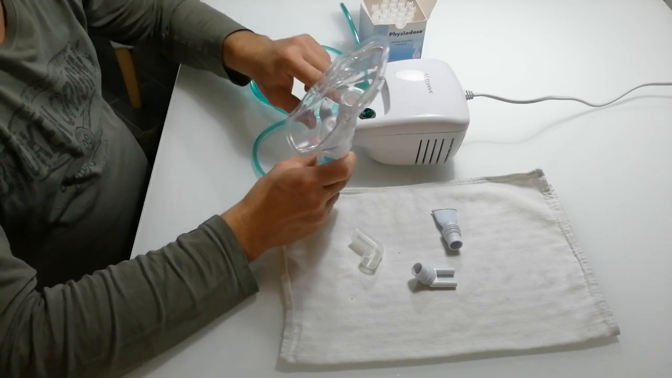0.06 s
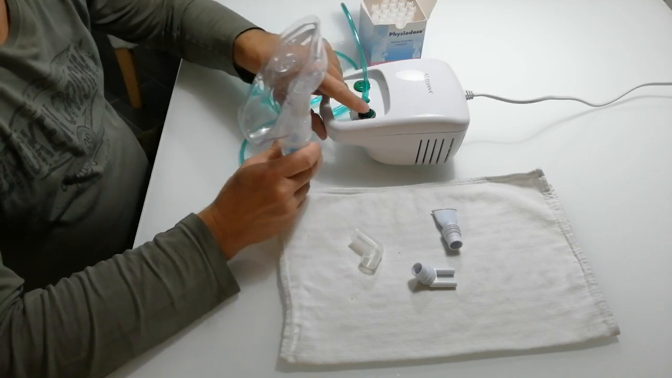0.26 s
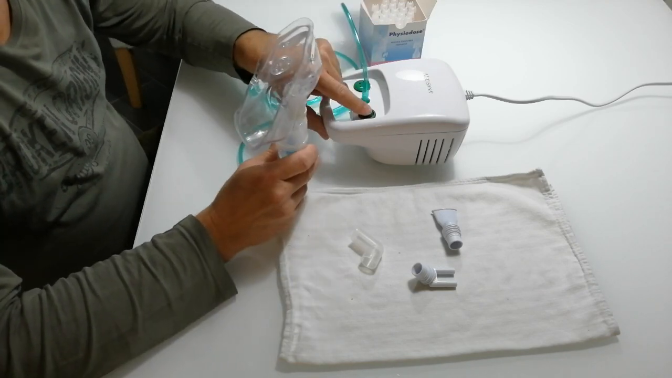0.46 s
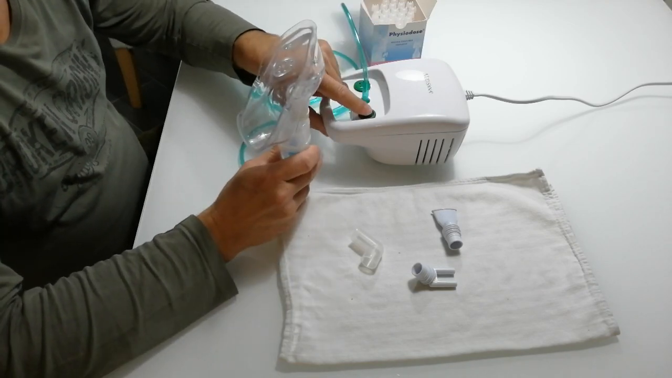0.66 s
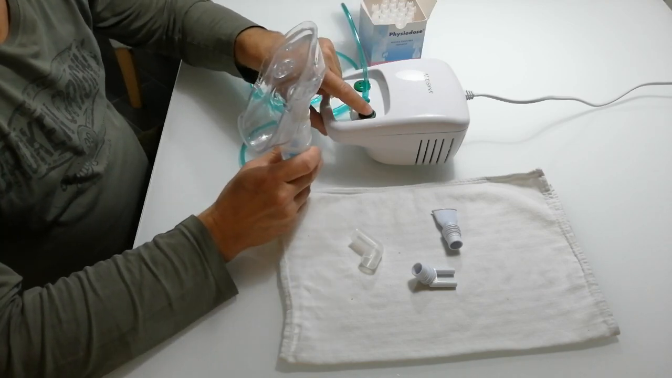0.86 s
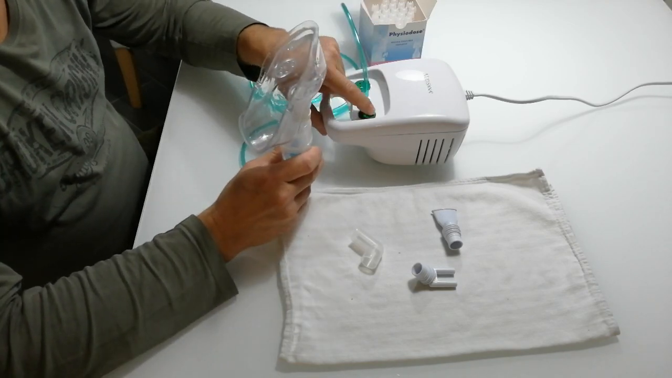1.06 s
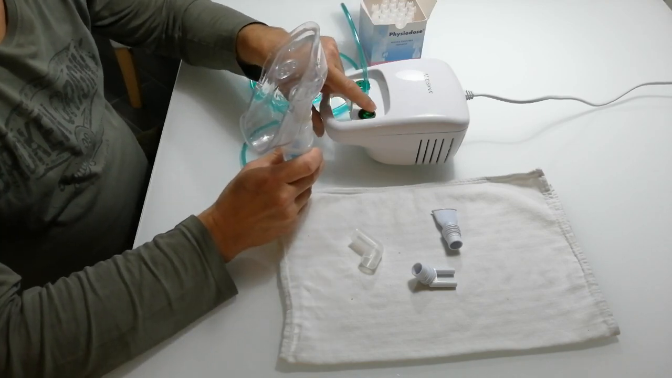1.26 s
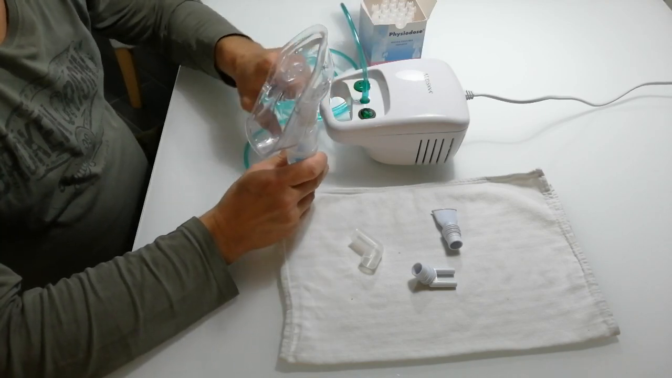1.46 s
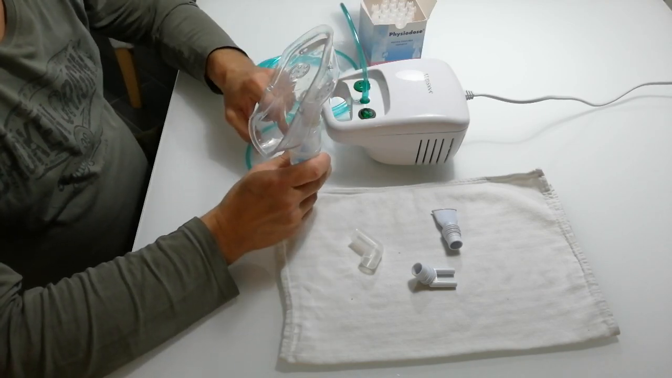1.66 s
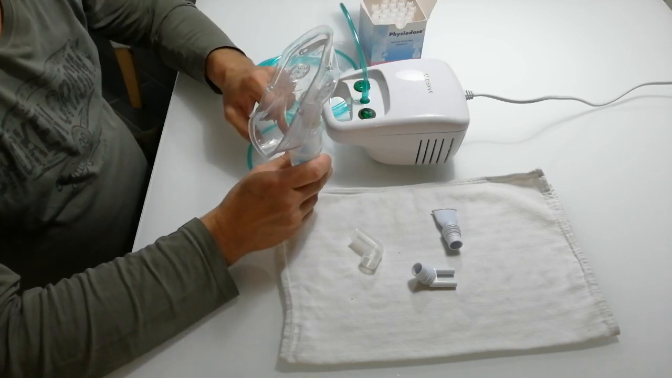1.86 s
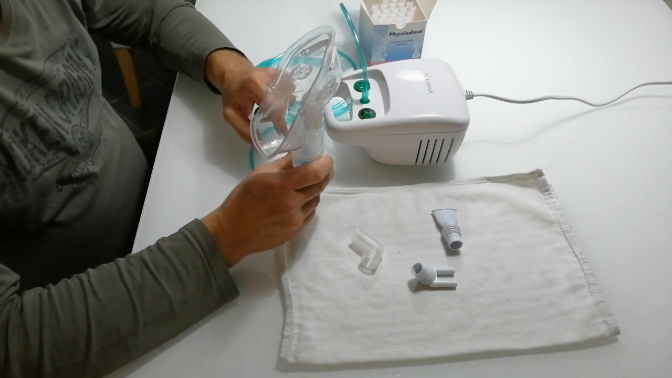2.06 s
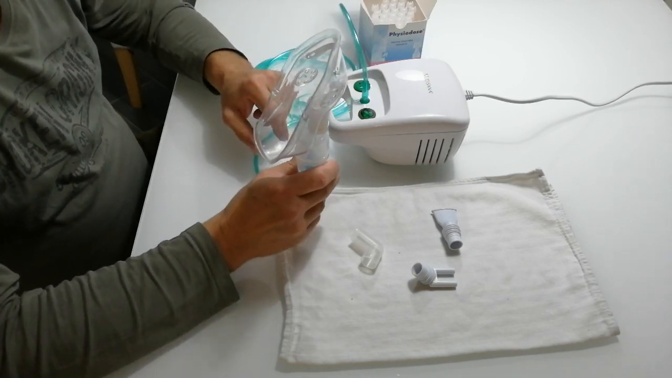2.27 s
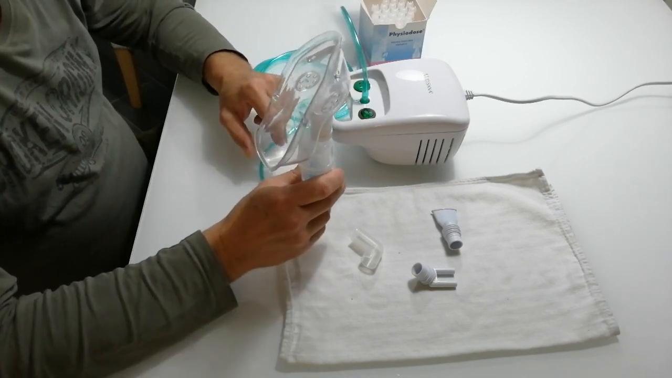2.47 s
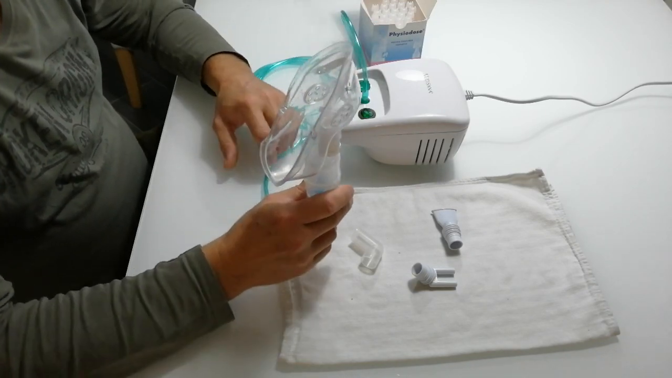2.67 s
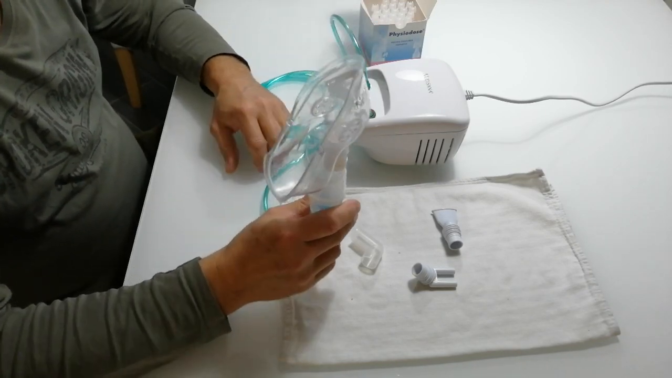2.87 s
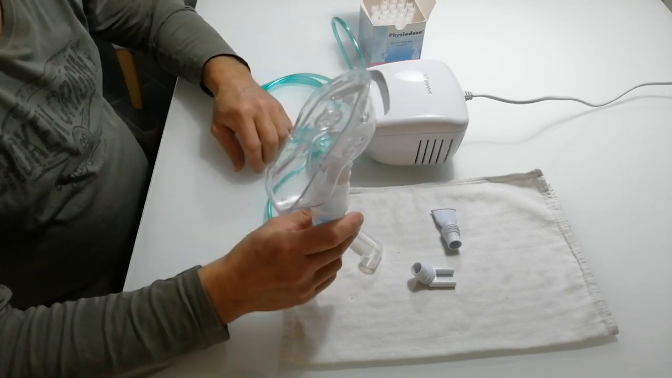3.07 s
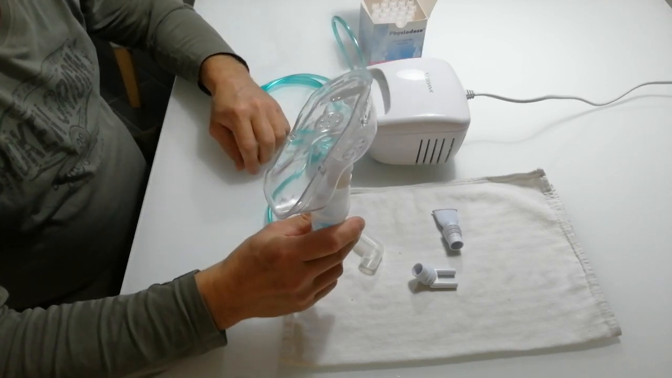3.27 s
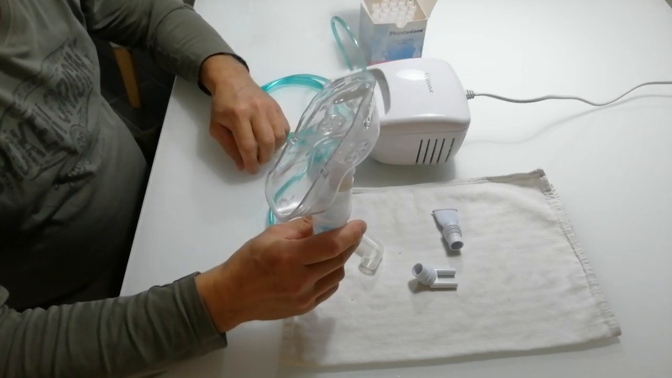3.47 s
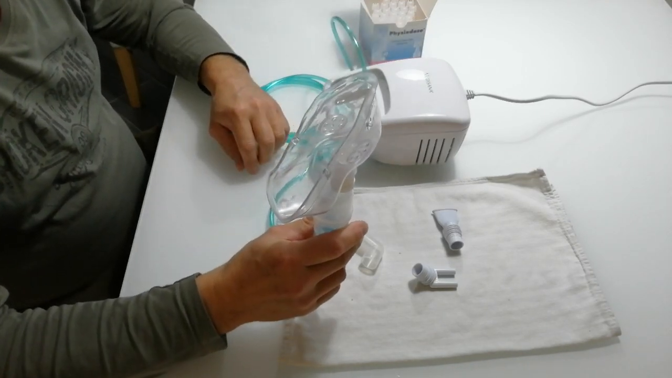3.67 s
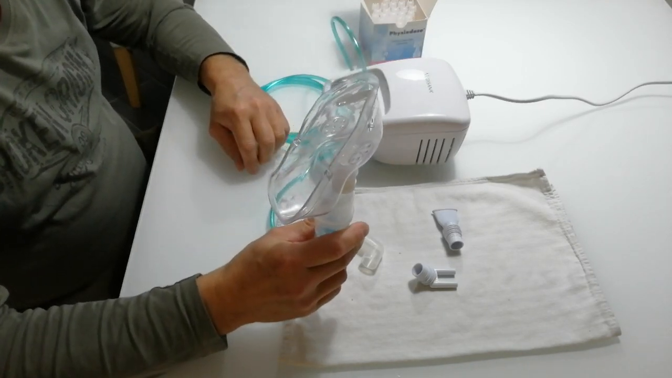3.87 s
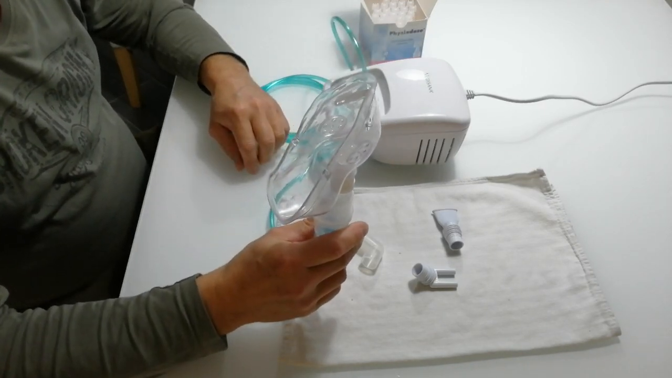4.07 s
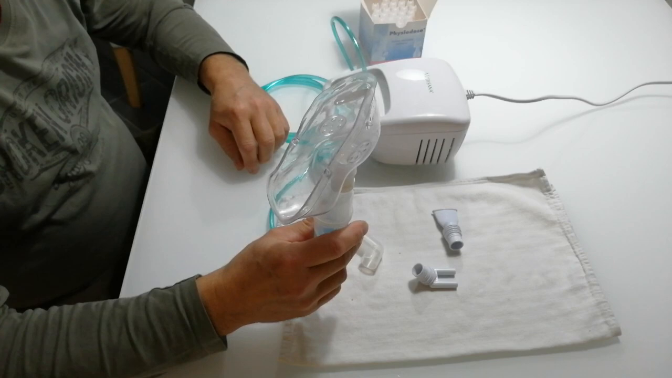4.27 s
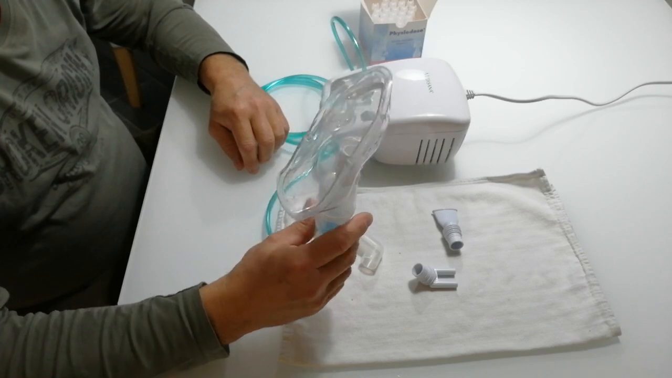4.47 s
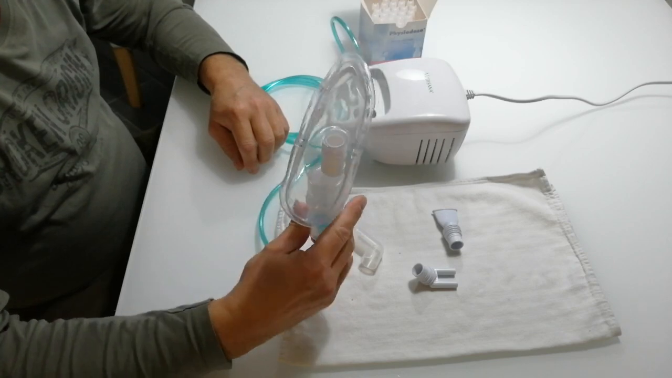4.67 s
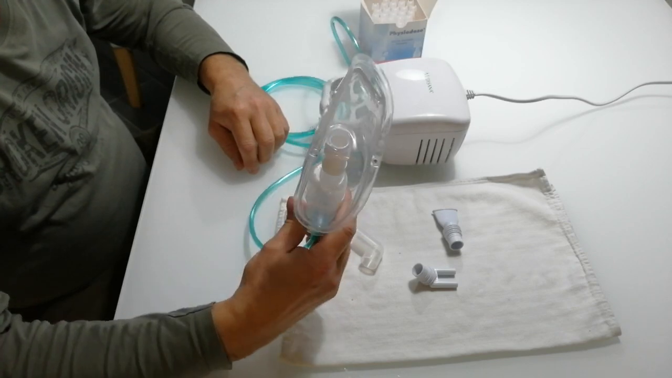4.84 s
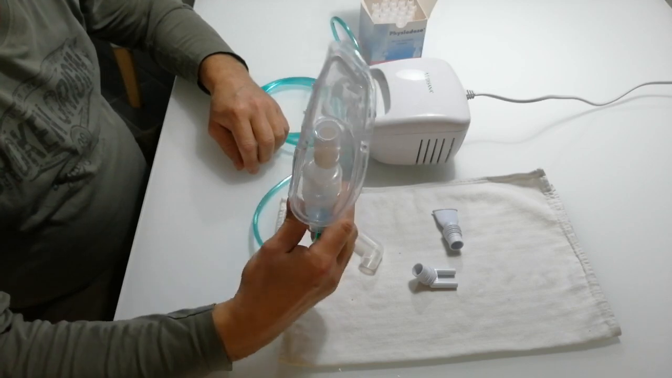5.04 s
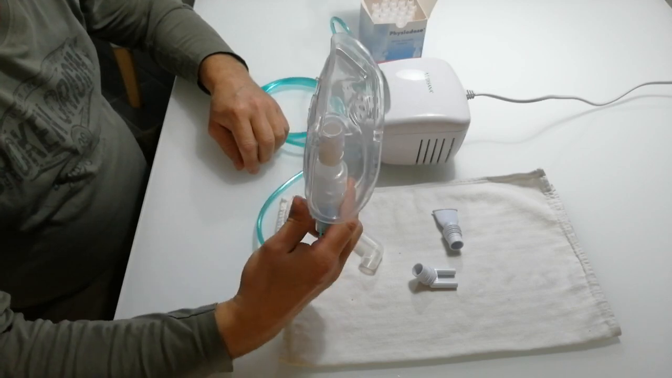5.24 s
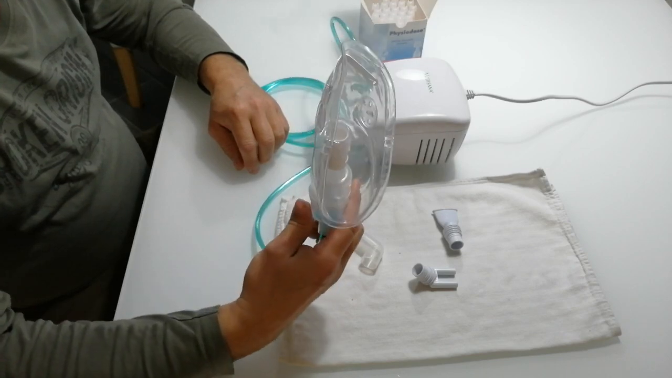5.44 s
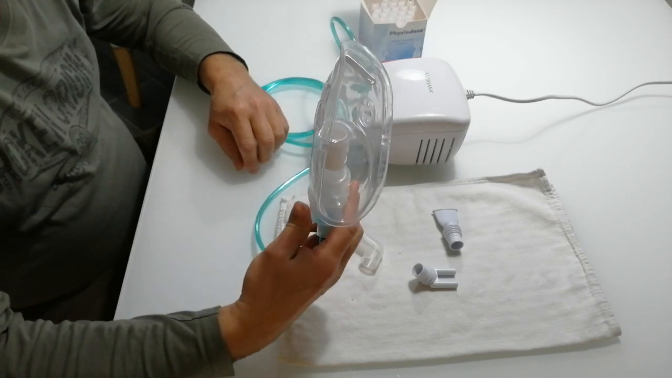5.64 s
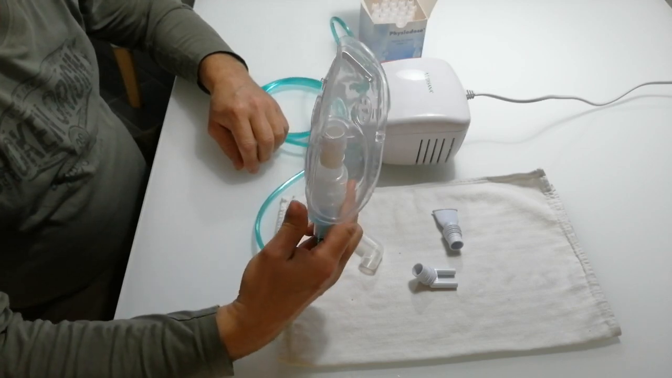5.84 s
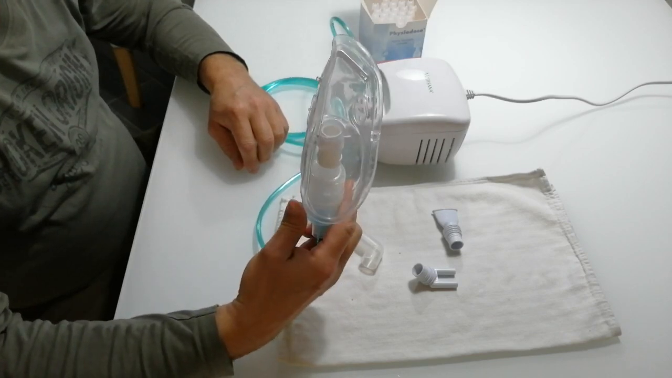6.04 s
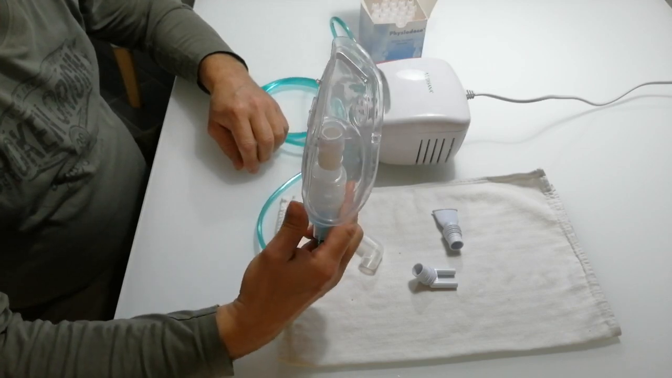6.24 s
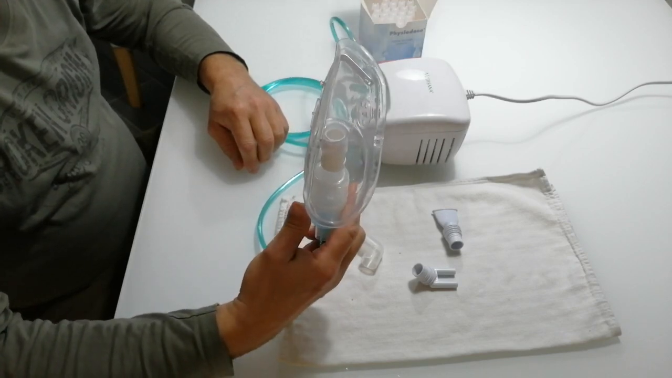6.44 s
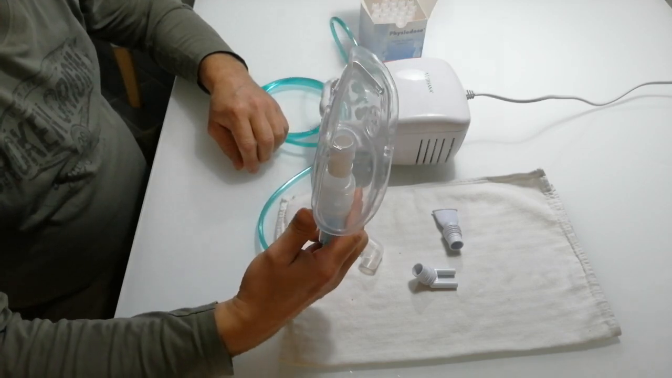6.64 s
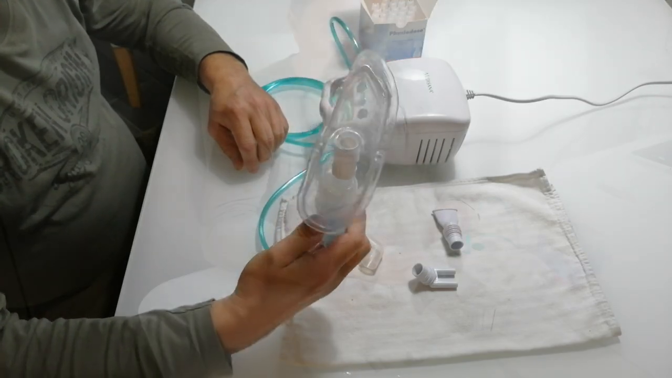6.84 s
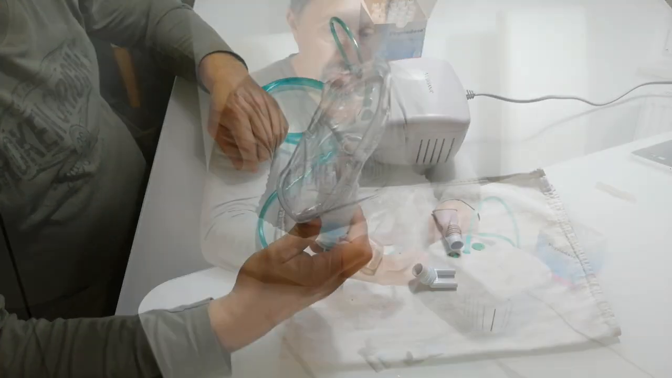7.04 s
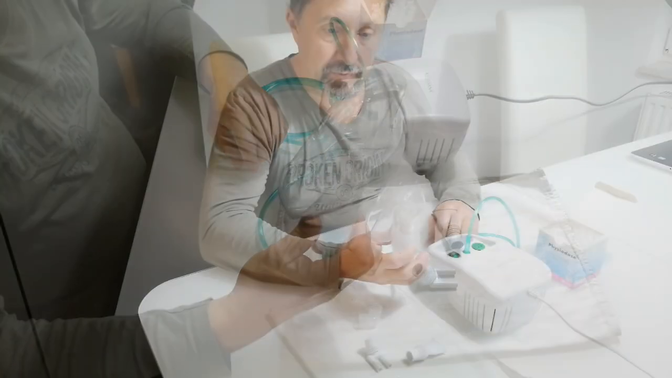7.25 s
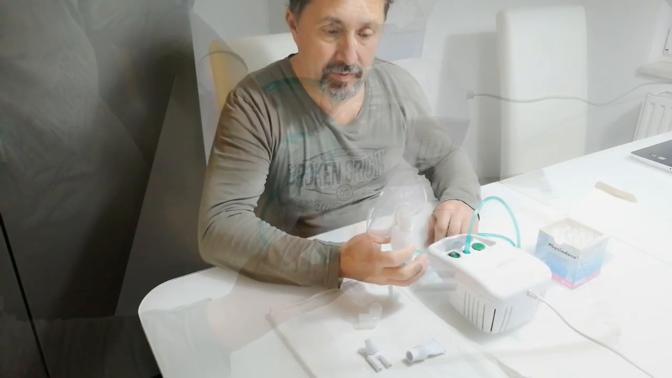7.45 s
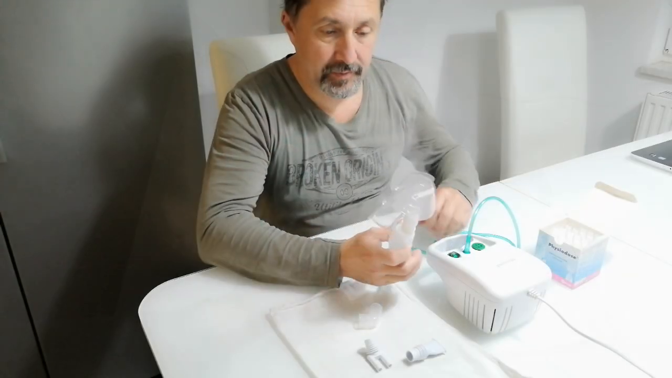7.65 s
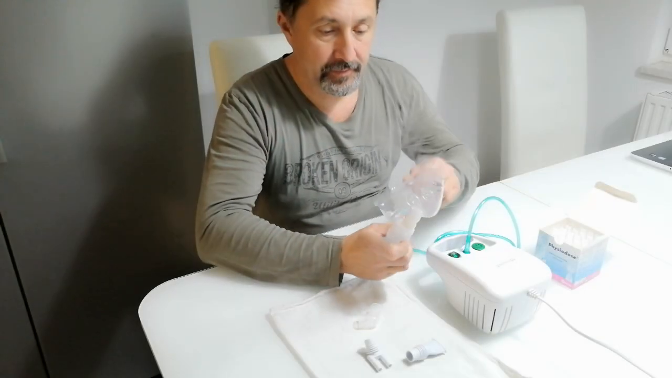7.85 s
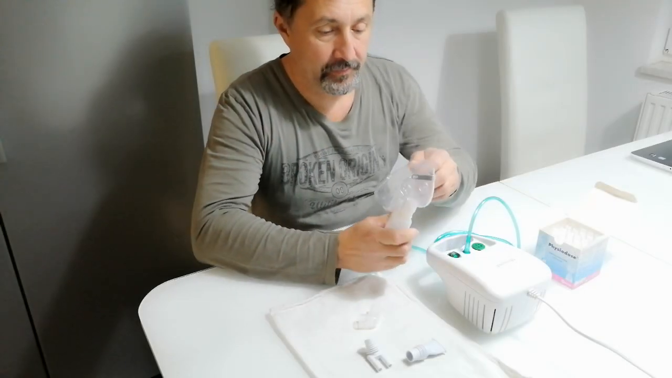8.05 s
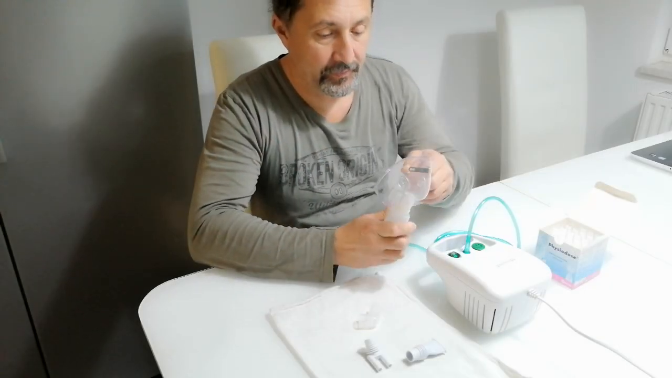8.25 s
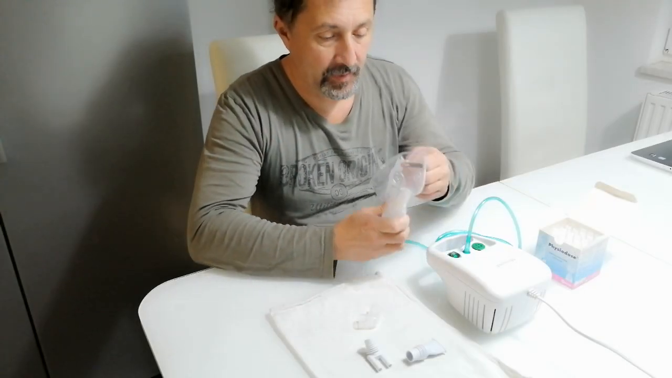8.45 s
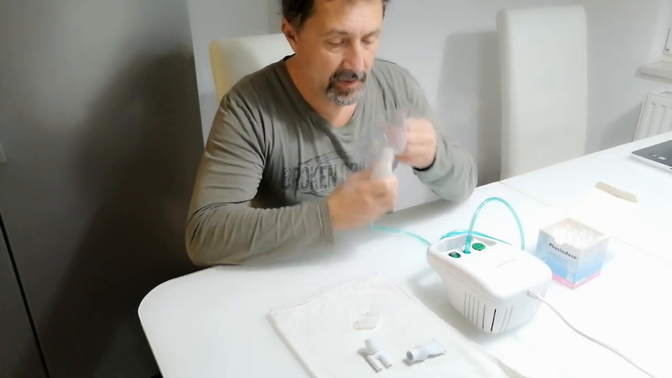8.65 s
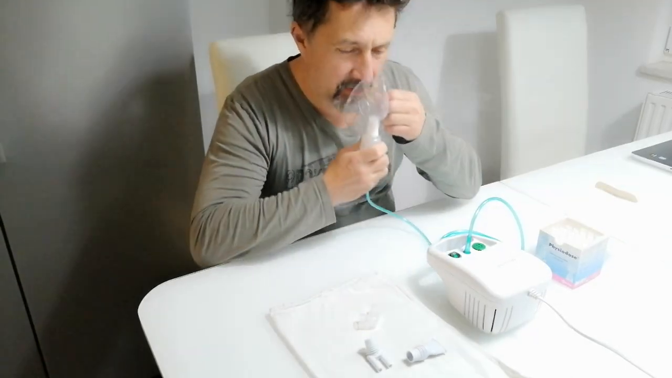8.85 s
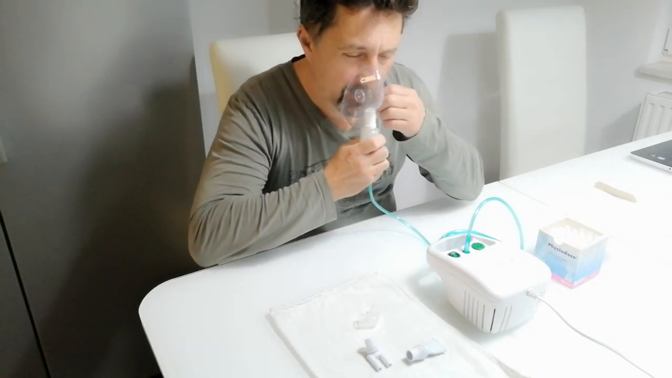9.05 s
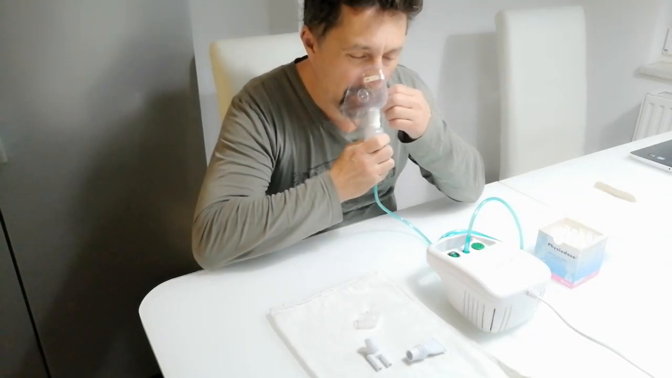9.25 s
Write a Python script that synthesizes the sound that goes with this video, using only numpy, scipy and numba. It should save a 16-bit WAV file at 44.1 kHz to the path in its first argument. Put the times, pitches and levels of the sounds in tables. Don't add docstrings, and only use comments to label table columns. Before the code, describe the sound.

Close in a quiet room, dull knocks come through a table, a plastic mask creaks faintly and an arm judders low on the tabletop. A rocker switch snaps, a small piston compressor stutters and spins up, then drones with a rattling buzz while air hisses through a mist cup and moving mask. Occasional knocks follow; near the end the sound cross-fades to a thinner, farther position.

```python
import sys
import numpy as np
from scipy import signal
from scipy.fft import rfft, irfft, next_fast_len
from scipy.io import wavfile
from scipy.ndimage import map_coordinates
from numba import njit

SR = 44100
rng = np.random.default_rng(int(sys.argv[2]) if len(sys.argv) > 2 else 0)


def digitize_waveform(pressure):
    field = np.atleast_2d(pressure).T
    bounded = np.clip(field, -1, 1)
    quanta = np.round(bounded * 32767).astype(np.int16)
    wavfile.write(sys.argv[1], SR, quanta)


def voltage_ratio(decibels):
    exponent = np.asarray(decibels, float) / 20
    return 10 ** exponent


N = 410571
TIME = np.arange(N) / SR
CATCH_S, FULL_S = 1.28, 1.385

# (time [s], mouth turned to the microphone [0-1],
# extra path via the table top [ms], strength of that bounce [0-1])
HAND_POSES = [(1.3, 0.2, 1.8, .2), (1.66, 0.16, 1.82, .4), (1.75, 0.2, 1.84, .5), (2.1, .15, 1.9, .56),
              (3.1, 0.63, 2.3, .54), (4.45, 0.64, 2.3, .4), (4.7, 1, 2.1, .3), (5.2, 1, 2.0, .3),
              (6.6, 0.9, 1.8, .3), (7.9, 0.33, 1.6, .4), (8.25, .2, 1.7, 1), (8.42, .9, 1.7, .9),
              (8.6, 0.3, 1.6, .7), (8.85, 0.35, 1.35, .5), (9.0, 0.9, 1.3, .8), (9.15, 0.5, 1.33, .7),
              (9.31, 0.9, 1.36, .7)]
STAGE_S = [
    1.75,
    2.35,
    3.8,
    5.8,
]


def level(x, db):
    return x * voltage_ratio(db) / np.sqrt(np.mean(x ** 2))


@njit
def svf(x, hz, width):
    y, band, low = np.empty(len(x)), 0., 0.
    g, k = np.tan(np.pi * hz / SR), width / hz
    for i in range(len(x)):
        v = (band + g * (x[i] - low)) / (1 + g * (g + k))
        band = 2 * v - band
        low += 2 * g * v
        y[i] = k * v
    return y


def ring(x, modes):
    out = 0
    for k, (hz, width, db) in enumerate(modes):
        stage_width = 1.76 * width
        once = svf(x + 1e-18, 1. * hz, stage_width)
        out = out + (-1) ** k * voltage_ratio(db) * svf(once + 0, 1. * hz, stage_width)
    return out


def on_log(table, hz):
    points_hz, values = np.transpose(table)
    return np.interp(np.log(np.maximum(hz, 1)), np.log(points_hz), values)


def walk(rate, size=N):
    knots = rng.standard_normal(int(size * rate / SR) + 2)
    return np.interp(np.arange(size) * rate / SR, np.arange(len(knots)), knots)


def stereo_noise(spectrum, alike_hz, lag_s, size=N):
    fast = next_fast_len(size)
    hz = np.arange(fast // 2 + 1) * SR / fast
    mid = rfft(rng.standard_normal(fast))
    side = rfft(rng.standard_normal(fast))
    alike = 1 / (1 + (hz / alike_hz) ** 2)
    pair = np.sqrt(1 + alike) * mid + np.sqrt(1 - alike) * side * np.array([[1], [-1]])
    pair[0] *= np.exp(-2j * np.pi * hz * lag_s)
    return level(irfft(pair * voltage_ratio(on_log(spectrum, hz)), fast)[:, :size], 0)


def bursts(events, rise):
    out = np.zeros(N)
    for s, db, length in events:
        t = np.arange(int(3 * length * SR)) / SR
        shape = (1 - np.exp(-t / rise)) * np.exp(-np.log(1000) * t / (2 * length))
        start = int(s * SR)
        out[start:start + len(t)] += voltage_ratio(db) * shape * rng.standard_normal(len(t))
    return out


def ports(x, pan_db):
    return np.array([x, np.roll(x, 8)]) * voltage_ratio(np.array([[pan_db], [-pan_db]]) / 2)


def stroke_phases(db, smear):
    ring_after, stroke_lean = .55, 1.1
    log_gain = np.log(voltage_ratio(np.interp(np.arange(65), np.arange(1, len(db) + 1), db)))
    cepstrum = irfft(log_gain)
    cepstrum[1:64] *= 2
    cepstrum[65:] = 0
    return ring_after * rfft(cepstrum).imag[1:len(db) + 1] + stroke_lean + smear


def pump(span, hz, stages, stage_s, valve, sides, rattle, rattle_db, gate, smear, left_lag, turns=0.):
    size = len(hz)
    turn = 2 * np.pi * (turns + np.cumsum(hz * (1 + .0008 * walk(9, size))) / SR)
    db = np.array(stages)[:, :, 1]
    count = db.shape[1]
    blur = rng.standard_normal(count) * (1 + (np.arange(count) / 19) ** 4)
    phase = np.array([stroke_phases(row, share * blur) for row, share in zip(db, smear)])
    orders = []
    for k in range(count):
        order_db = np.interp(span, stage_s, db[:, k])
        orders.append((k + 1, order_db, np.interp(span, stage_s, phase[:, k])))
    orders += [(k, valve_db, rng.uniform(0, 2 * np.pi)) for k, valve_db in valve]
    out = np.zeros((2, size))
    for k, order_db, start in orders:
        gain = voltage_ratio(order_db + walk(5.9, size))
        lag = 0.007 * k * rng.standard_normal() + left_lag * k
        half_db = on_log(sides, k * hz.mean()) / 2
        out[0] += gain * voltage_ratio(half_db) * np.cos(k * turn + start - lag)
        out[1] += gain * voltage_ratio(-half_db) * np.cos(k * turn + start + lag)
    puffs = 1 + gate * np.cos(2 * turn) + 0.13 * np.cos(turn)
    return level(-out, 0) + voltage_ratio(rattle_db) * puffs * stereo_noise(rattle, 880, -0.000051, size)


def stroke_rate():
    start, free, loaded = 35, 44.5, 42.785
    sag = loaded + (free - loaded) / (1 + np.maximum(TIME - 1.42, 0) / 1.28) ** 3
    return np.minimum(sag, np.interp(TIME, [CATCH_S, FULL_S], [start, free]))


def jet():
    # (frequency [Hz], width [Hz], level [dB])
    cup_modes = [(4205, 580, -15), (5120, 253, -2), (5460, 460, -8.5), (6235, 348, 0), (6880, 460, -11.5),
                 (7296, 426, -10)]
    # (frequency [Hz], width [Hz], level [dB])
    mask_modes = [(10570, 470, -4.5), (11230, 730, 1), (11900, 880, -6), (12400, 1000, -0.5),
                  (14100, 4600, -18.5)]
    # (frequency [Hz], width [Hz], level [dB])
    mouth_modes = [(8260, 270, -5.5), (9160, 920, 7.5)]
    pose_every_s = .33
    air = rng.standard_normal(N) * voltage_ratio(1.16 * walk(14) + 0.87 * walk(300))
    poses = np.linspace(1.2, N / SR, round(8 / pose_every_s))
    echoes = rng.standard_normal((len(poses), 2, 4000)) * np.exp(-np.arange(4000) / (0.05 * SR))
    echoes[:, :, 0] = [9, -9]
    heard = 14 * rng.standard_normal((2, N))
    for k, pair in enumerate(echoes):
        share = np.sqrt(np.interp(TIME, poses, np.arange(len(poses)) == k))
        on = np.flatnonzero(share)
        posed_air = (air * share)[None, on[0]:on[-1]]
        part = signal.fftconvolve(posed_air, pair, axes=1)[:, :N - on[0]]
        heard[:, on[0]:on[0] + part.shape[1]] += part
    cup = np.array([level(ring(port, cup_modes), 3.96) for port in heard])
    mask = np.array([level(ring(port, mask_modes), db) for port, db in zip(heard, (5, -9))])
    s, _, path_ms, strength = np.transpose(HAND_POSES)
    late = TIME - np.interp(TIME, s, path_ms) / 1000
    bounce = np.array([map_coordinates(port, [late * SR], order=3) for port in mask])
    mask += np.interp(TIME, s, strength) * bounce
    mouth = np.array([level(ring(port, mouth_modes), db) for port, db in zip(heard, (2, 0))])
    return np.array([cup, mask, mouth])


def position(share, strokes, load_db, levels_db, facing_db, jets):
    # (pump [dB], cup [dB], mask [dB], mouth [dB], cup left minus right [dB])
    tremble_db = (.3, .2, .5, 1.5, .5)
    on = share > 0
    span = TIME[on]
    facing = np.interp(TIME, *np.transpose(HAND_POSES)[:2])
    moving = []
    for db, more, shake in zip(levels_db, facing_db, tremble_db):
        moving.append((db + more * facing + shake * walk(6))[on])
    pump_db, cup_db, top_db, mouth_db, pan_db = moving
    cup, mask, mouth = jets[:, :, on]
    running = np.sqrt(np.interp(span, [CATCH_S, FULL_S], [0, 1]))
    air = voltage_ratio(top_db) * mask + voltage_ratio(mouth_db) * mouth
    air += voltage_ratio(cup_db + np.array([pan_db, -pan_db]) / 2) * cup
    nozzle = voltage_ratio(np.interp(span, [1.37, 1.37 + 0.022], [-18.5, 0])) * (span > 1.29)
    out = np.zeros((2, N))
    out[:, on] = voltage_ratio(pump_db + load_db[on]) * strokes * running + air * nozzle
    return out * share


def close_position(near, rate, jets):
    # (multiple of the stroke rate, level [dB])
    building = [(1, -15), (2, -13), (3, -16), (4, -1.5), (5, -13.5), (6, -16), (7, -9), (8, -8), (9, -10.5),
                (10, -20), (11, -4.5), (12, -11), (13, -10), (14, 1), (15, -5.5), (16, -17), (17, -25),
                (18, -19), (19, -21), (20, -23), (21, -26), (22, -17.5), (23, -27), (24, -25), (25, -20),
                (26, -21), (27, -17), (28, -27), (29, -25), (30, -30)]
    # (multiple of the stroke rate, level [dB])
    settled = [(1, -16.5), (2, -11.5), (3, -14.5), (4, -1.5), (5, -7.5), (6, -17.5), (7, -1.5), (8, -16.5),
               (9, -11.5), (10, -4.5), (11, -10.5), (12, 0), (13, -1), (14, -0.5), (15, -9), (16, -17),
               (17, -4.5), (18, -18.5), (19, -26), (20, -25), (21, -26), (22, -20), (23, -34), (24, -18.5),
               (25, -25), (26, -11), (27, -32.5), (28, -22), (29, -18), (30, -15.5)]
    # (multiple of the stroke rate, level [dB])
    later = [(1, -18.5), (2, -13), (3, -14.5), (4, -1.5), (5, -8.5), (6, -18), (7, -3), (8, -19),
             (9, -13.5), (10, -2.5), (11, -10), (12, -2), (13, -2.5), (14, 1), (15, -2), (16, -18.5),
             (17, -11.5), (18, -10.5), (19, -19), (20, -12.5), (21, -28), (22, -16.5), (23, -24.5),
             (24, -22), (25, -20), (26, -10), (27, -14.5), (28, -15.5), (29, -9.5), (30, -15)]
    # (multiple of the stroke rate, level [dB])
    valve = [(31, -14.5), (32, -35), (33, -20), (34, -25), (35, -27.5), (36, -25), (43, -20), (45, -19.5),
             (47, -34), (50, -27.5)]
    # (frequency [Hz], left minus right [dB])
    sides = [(60, -7), (110, -0.5), (200, -4), (370, -2.5), (690, -2.5), (1270, -3.5), (2330, -7),
             (4300, -0.5), (7910, -3.5), (14600, 13.5)]
    # (frequency [Hz], density [dB per Hz])
    rattle = [(30, -18), (60, -9), (200, -8), (600, 0), (850, -7.5), (1250, -7.5), (1700, -10.5),
              (2400, -10.5), (3050, -4), (3500, -12), (4300, -18.5)]
    # (pump [dB], cup [dB], mask [dB], mouth [dB], cup left minus right [dB])
    levels_db = (-37, -40.5, -49.5, -66, 0)
    facing_db = (0, 0, 2.5, 13.5, -3.5)
    on = near > 0
    strokes = pump(TIME[on], rate[on], [building, settled, settled, later], STAGE_S, valve, sides, rattle,
                   rattle_db=-11, gate=0.062, smear=[0.99, 0.55, 0.57, 0.51], left_lag=-0.021)
    load_db = -0.7 * np.exp(-np.maximum(TIME - FULL_S, 0) / 1)
    return position(near, strokes, load_db, levels_db, facing_db, jets)


def far_position(far, jets):
    # (multiple of the stroke rate, level [dB])
    afar = [(1, -54.5), (2, -30), (3, -35.5), (4, -11), (5, -22), (6, -48.5), (7, -14), (8, -13.5),
            (9, -11.5), (10, -21), (11, -15), (12, -20), (13, -15), (14, 1), (15, -17.5), (16, -22.5),
            (17, -31), (18, -51), (19, -30), (20, -36), (21, -34), (22, -31), (23, -37), (24, -26.5),
            (25, -23), (26, -45), (27, -29.5), (28, -22), (29, -22), (30, -37.5)]
    # (multiple of the stroke rate, level [dB])
    valve = [(31, -28), (33, -26.5), (35, -26), (37, -35), (48, -42.5)]
    # (frequency [Hz], left minus right [dB])
    sides = [(60, -14), (110, -13), (200, -4), (370, -4.5), (690, 1), (1270, -2), (2330, 32.5),
             (4300, -3.5), (7910, -4.5), (14600, 9.5)]
    # (frequency [Hz], density [dB per Hz])
    rattle = [(30, -34), (60, -32), (200, -3.5), (600, 2), (850, -13), (1250, -4), (1700, -10.5),
              (2400, -17.5), (3050, -12), (3500, -29), (4300, -23.5)]
    # (pump [dB], cup [dB], mask [dB], mouth [dB], cup left minus right [dB])
    levels_db = (-35.6, -46, -62, -75, -3.5)
    facing_db = (0.5, -.5, 9, 10, -1)
    on = far > 0
    rate = 43.212 + .06 * np.maximum(TIME - 7.66, 0)
    strokes = pump(TIME[on], rate[on], [afar], [8], valve, sides, rattle,
                   rattle_db=-16.5, gate=0.33, smear=[.9], left_lag=0.015, turns=.104)
    return position(far, strokes, 0 * TIME, levels_db, facing_db, jets[..., ::-1])


def motor(rate):
    # (strokes added to the hum, level [dB])
    slot_tones = [(20, -59), (19, -68.5), (12, -60.5)]
    turn = 2 * np.pi * np.cumsum(rate) / SR
    hum = 2 * np.pi * 100 * TIME
    tones = sum(voltage_ratio(db + 1.5 * walk(2.6)) * np.sin(k * turn + hum) for k, db in slot_tones)
    return tones * np.interp(TIME, STAGE_S[:2], [0, 1])


def switch():
    # (frequency [Hz], width [Hz], level [dB])
    rocker = [(696, 330, -9), (1130, 210, -3), (1620, 180, 7), (2150, 310, 4.5), (2800, 310, 4),
              (3600, 300, -5.5), (5200, 690, -6.5), (6200, 360, -12), (7900, 2100, -9), (10600, 3100, -9.5)]
    # (time [s], level [dB])
    first_strokes = [
        (1.255, -45.5),
        (1.277, -36),
        (1.302, -32.5),
        (1.335, -36),
    ]
    switch_s = 1.1365
    snap = bursts([(switch_s, -34.5, .012)], 0.00062)
    tails = [bursts([(switch_s + 0.0048, -45.5, 0.43 / 2)], 0.0012) for _ in range(2)]
    strokes = np.zeros(N)
    for s, db in first_strokes:
        strokes[int(s * SR)] = voltage_ratio(db)
    casing = voltage_ratio(55) * ring(strokes, [(627, 21.4, 0)])
    return voltage_ratio(8) * np.array([ring(snap + tail, rocker) for tail in tails]) + casing


def mask_creaks():
    # (time [s], level [dB], length [s])
    creaks = [
        (.42, -66, .04),
        (.503, -60, 0.076),
        (.756, -64, .06),
        (.9, -66, .02),
    ]
    # (frequency [Hz], width [Hz], level [dB])
    plastic = [(4600, 1500, 2), (8500, 1500, -12), (11300, 2000, 0)]
    return ring(bursts(creaks, .002), plastic) * voltage_ratio(np.array([[4], [-4]]))


def judder():
    t = TIME - 0.851
    rise = (-np.minimum(t, 0) / .12) ** 1.7
    fall = (np.maximum(t, 0) / 0.11) ** 3.4
    grip = voltage_ratio(-10 * np.where(t < 0, rise, fall))
    turn = 2 * np.pi * np.cumsum(96.3 - 5.8 * grip) / SR
    second = voltage_ratio(-43 - 10 * ((TIME - 0.84) / 0.068) ** 2)
    tone = voltage_ratio(-35) * grip * np.sin(turn)
    tone += second * (np.sin(2 * turn + 1.6) + 0.11 * np.sin(3 * turn))
    return ports(np.sqrt(2) * tone, pan_db=-5.0)


def knocks():
    # (time [s], peak level [dB], floor boom level [dB])
    hits = [
        (.277, -32, -32),
        (.415, -39.5, -35),
        (2.195, -33, -38),
        (4.09, -32, -44),
        (5.965, -32.5, -36),
        (7.632, -30, -53),
        (7.761, -33.5, -55),
    ]
    # (time after the blow [s], level [dB], length [s])
    rebounds = [
        (0, 0, .06),
        (.027, -6, 0.12),
        (.1, -12.5, .1),
    ]
    # (frequency [Hz], width [Hz], level [dB])
    table_modes = [(125.6, 36, -0.5), (215, 60, -4), (262, 70, -3.5), (307, 56, -4.5), (440, 67, -10.5),
                   (670, 210, -20.5), (1150, 810, -24)]
    blows = [(s + late, db + less, length) for s, db, _ in hits for late, less, length in rebounds]
    top = voltage_ratio(24) * ring(bursts(blows, .006), table_modes)
    floor = bursts([(s + 0.0228, db, .17) for s, _, db in hits], 0.05)
    boom = voltage_ratio(22.0) * ring(floor, [(56, 20, 0)])
    return ports(top + boom, pan_db=1.7)


def quiet_room(far):
    # (frequency [Hz], density [dB per Hz])
    room_tone = [(15, -17), (25, 3.5), (460, -3), (1190, -13), (1870, -15.5), (2140, -15), (2380, -17),
                 (3010, -19), (3440, -20.5), (4250, -24), (7420, -28), (8030, -30.5), (14000, -40)]
    noise = voltage_ratio(-56.5 - 3.5 * far + 0.46 * walk(6.8)) * stereo_noise(room_tone, 680, -0.00021)
    return signal.sosfilt(signal.butter(8, 13300, fs=SR, output="sos"), noise)


def scene():
    # (time [s], share [0-1])
    fade_in = [
        (6.68, 0),
        (7.66, 1),
    ]
    # (time [s], share [0-1])
    fade_out = [
        (6.9, 1),
        (7.72, 0),
    ]
    far = np.interp(TIME, *np.transpose(fade_in))
    near = np.sqrt(np.interp(TIME, *np.transpose(fade_out))) * (TIME > CATCH_S)
    rate = stroke_rate()
    jets = jet()
    machine = close_position(near, rate, jets) + far_position(far, jets) + motor(rate) * near
    events = switch() + mask_creaks() + judder() + knocks()
    return machine + events + quiet_room(far)


def low_pass(x):
    return signal.sosfilt(signal.butter(12, 15160, fs=SR, output="sos"), x)


def record(dry):
    heard = signal.sosfilt(signal.butter(4, 38, "high", fs=SR, output="sos"), dry)
    return low_pass(heard)


dry = scene()
out = record(dry)
digitize_waveform(out)
```